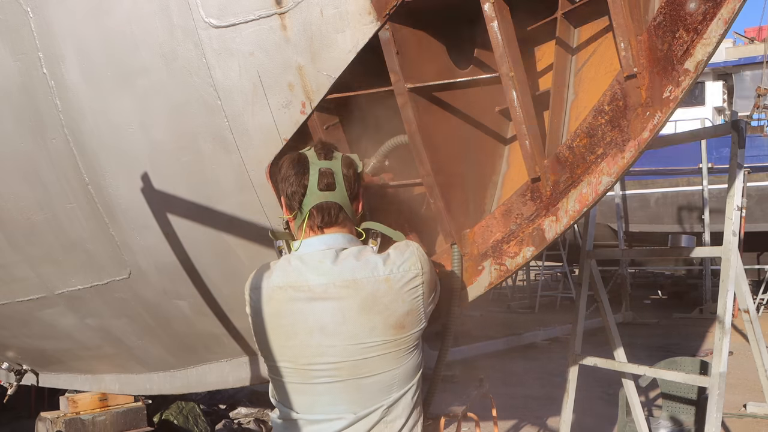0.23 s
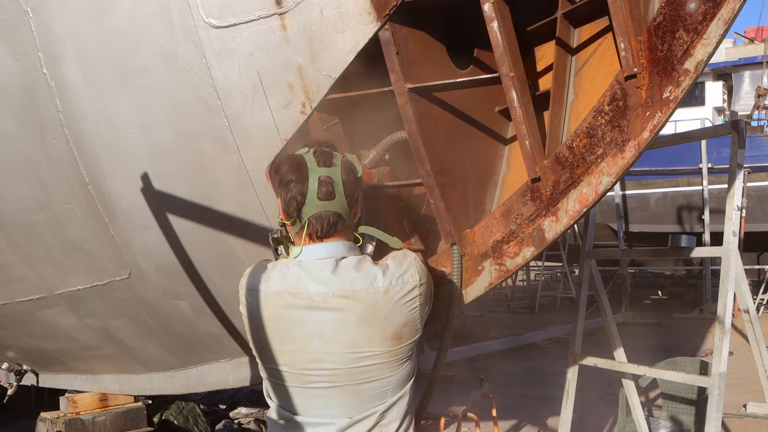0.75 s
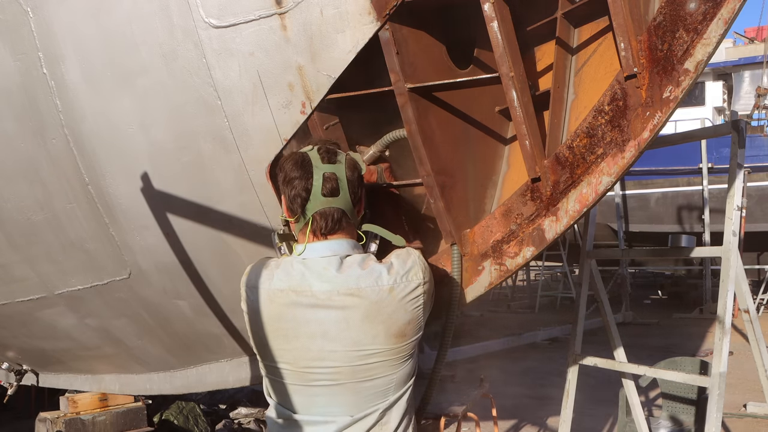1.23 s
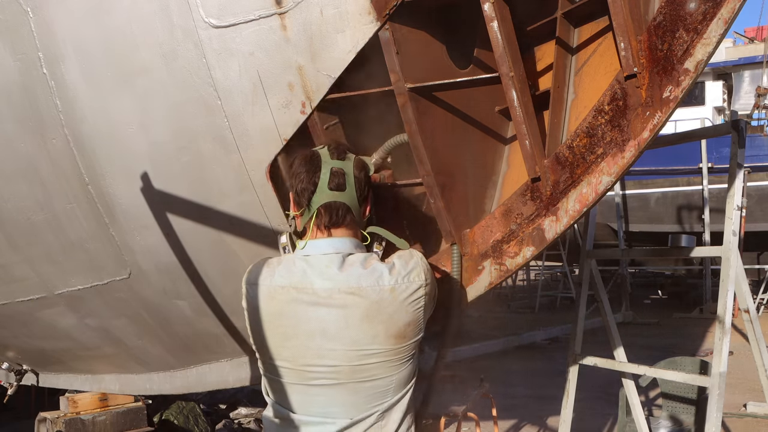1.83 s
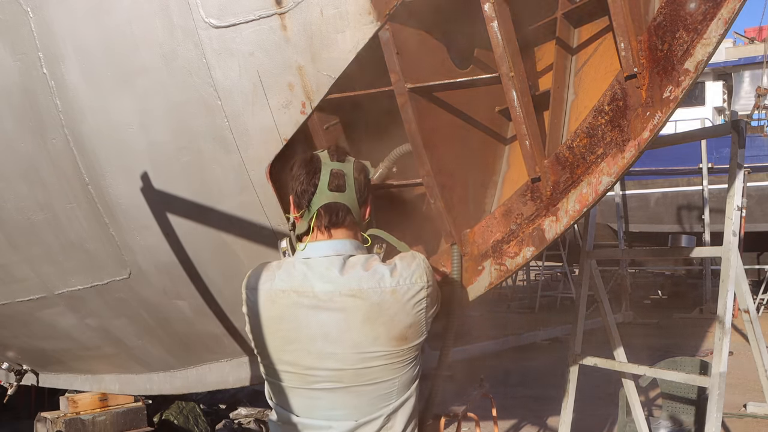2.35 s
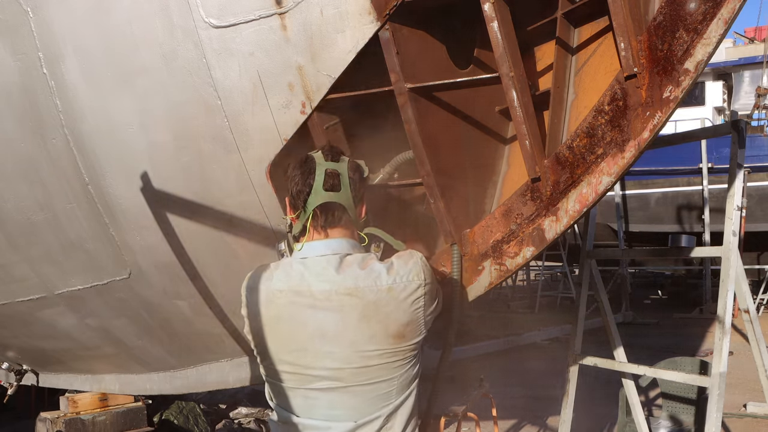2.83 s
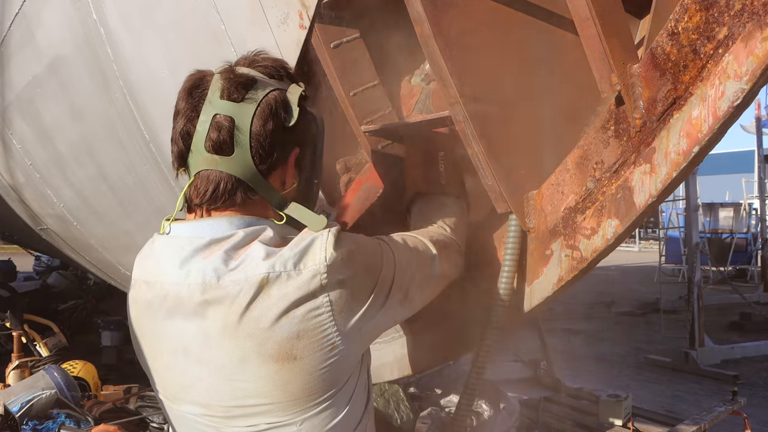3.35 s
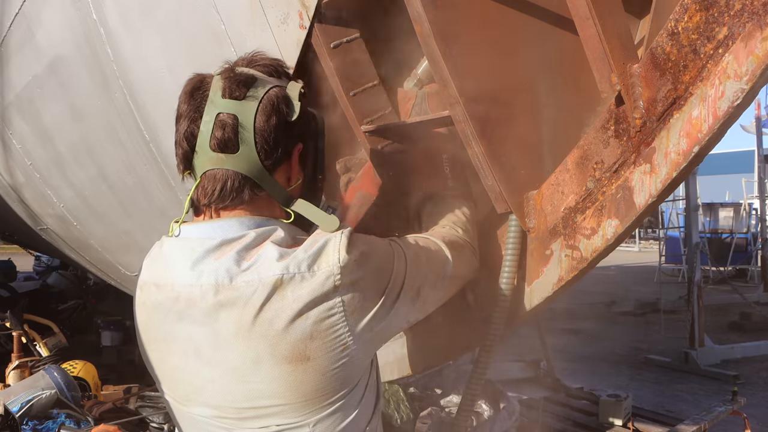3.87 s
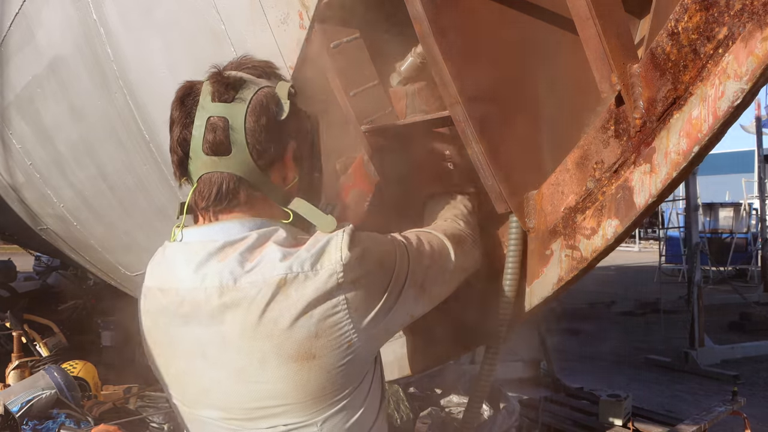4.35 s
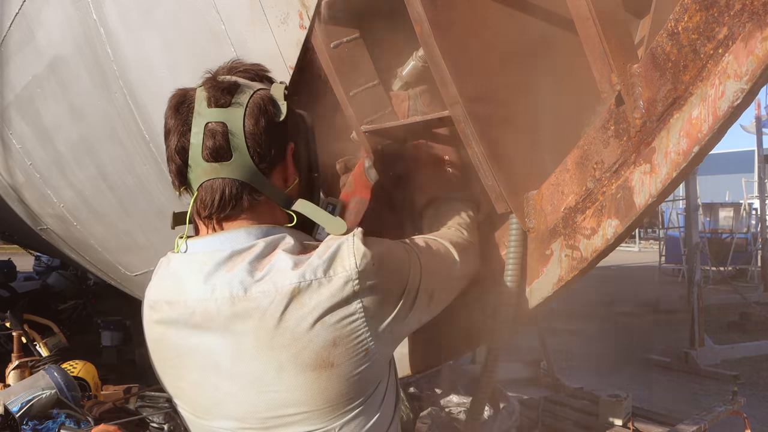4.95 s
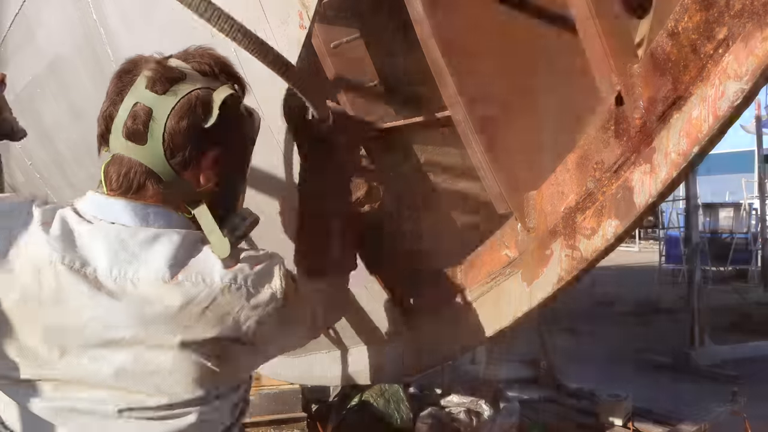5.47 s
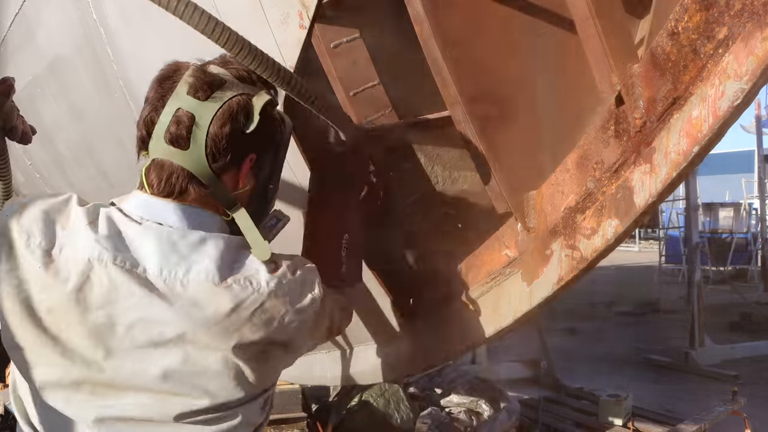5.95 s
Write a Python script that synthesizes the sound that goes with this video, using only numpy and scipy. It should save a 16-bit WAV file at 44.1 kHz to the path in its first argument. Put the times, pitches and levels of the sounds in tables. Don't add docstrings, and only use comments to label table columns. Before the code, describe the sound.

A continuous harsh sandblasting hiss scours steel plate, with a breathy roar from a hollow bay and faint wind bumps, brightening abruptly halfway through.

```python
import sys
import numpy as np
from scipy import signal
from scipy.fft import rfft, irfft, next_fast_len
from scipy.io import wavfile
from scipy.ndimage import uniform_filter1d, map_coordinates

SR = 44100
rng = np.random.default_rng(int(sys.argv[2]) if len(sys.argv) > 2 else 0)


def to_wav(sig):
    pcm = np.clip(np.atleast_2d(sig), -1, 1) * 32767
    pcm = np.round(pcm).astype(np.int16)
    wavfile.write(sys.argv[1], SR, pcm.T)


def invert_db(x):
    u = np.asarray(x, float) / 20
    return 10 ** u


N = 273661
EDGE = 1024


def unit(x):
    return x / np.sqrt(np.mean(x ** 2) + 1e-20)


def along(points, hz):
    f, v = np.transpose(points)
    return np.interp(np.log(hz + 1), np.log(f + 1), v, left=-120)


def wobble(rate):
    knots = rng.standard_normal(int(N * rate / SR) + 4)
    return unit(map_coordinates(knots, [np.arange(N) * rate / SR]))


def filtered(x, response):
    m = next_fast_len(len(x) + 8192)
    return irfft(rfft(x, m) * response(np.fft.rfftfreq(m, 1 / SR)), m)[:len(x)]


def lifted(modes, hz):
    return invert_db(sum(db * np.exp(-np.log(16) * ((hz - c) / w) ** 2) for c, w, db in modes))


def curves(rows):
    s, *cols = np.transpose(rows)
    return np.array([np.interp(np.arange(N) / SR, s, c) for c in cols])


def stepped(rows, moves):
    return np.transpose(rows)[:, np.searchsorted(moves[1:-1], np.arange(N) / SR)]


def bumps(rows):
    t = np.arange(0, N + 8, 8) / SR
    lift_db = sum(db * np.exp(-.5 * ((t - s) / life) ** 2) for s, life, db in rows)
    return np.interp(np.arange(N) / SR, t, lift_db)


def patchy(x, patch_db, size, bins, frames):
    z = signal.stft(x, nperseg=size)[2]
    field = uniform_filter1d(rng.standard_normal(z.shape), bins, 0)
    field = uniform_filter1d(field, frames, 1)
    return signal.istft(z * invert_db(patch_db * unit(field)), nperseg=size)[1][:N]


def in_hull(x, rust_db, modes_db):
    rusty = patchy(x, rust_db, size=512, bins=6, frames=12)
    return patchy(rusty, modes_db, size=2048, bins=2, frames=8)


def impacts(spread_db):
    return rng.standard_normal(N) * invert_db(spread_db * rng.standard_normal(N))


PLACE_TIMES = [0, 2.95, 5.468, 6.21]
STAGE_TIMES = [0, .55, 1.6, 2.95, 3.055, 4.76, 5.468, 5.575, 5.8, 6.035, 6.21]
PLACE_OF_STAGE = [0, 0, 0, 1, 1, 1, 2, 2, 2, 2]


def by_place(x, response, moves=PLACE_TIMES):
    ends = np.minimum(np.round(np.multiply(moves, SR)).astype(int), N)
    wide = np.pad(x, EDGE, mode="reflect")
    stretches = []
    for k, (a, b) in enumerate(zip(ends, ends[1:])):
        coloured = filtered(wide[a:b + 2 * EDGE], lambda hz: response(k, hz))
        stretches.append(unit(coloured[EDGE:-EDGE]))
    return np.concatenate(stretches)


# f/Hz, level/dB
WIND_COLOUR = [(10, -17), (50, -15), (100, -7), (150, -20), (200, -17), (370, -120)]
BREEZE_DB = [-71, -71.5, -74]
# t/s, f/Hz, length/s, level/dB
WIND_PUFFS = [(.004, 90, .006, -55), (.228, 70, .007, -56), (.258, 125, .013, -51), (.32, 70, .007, -57),
              (.35, 100, .012, -58), (.76, 60, .006, -57), (1.742, 95, .009, -52), (1.77, 80, .008, -54),
              (1.805, 190, .016, -46), (1.835, 35, .012, -60), (1.89, 80, .015, -60), (2.6, 70, .008, -59),
              (3.365, 90, .005, -56), (5.345, 80, .003, -57), (5.357, 280, .0009, -43),
              (5.47, 160, .003, -56)]


def wind():
    t = np.arange(N) / SR
    lumps = rng.standard_normal(N) * invert_db(4 * wobble(25))
    breeze = by_place(lumps, lambda k, hz: invert_db(along(WIND_COLOUR, hz)))
    out = breeze * invert_db(np.take(BREEZE_DB, np.searchsorted(PLACE_TIMES[1:3], t)))
    for s, hz, life, db in WIND_PUFFS:
        swell = invert_db(db) * np.exp(-.5 * ((t - s) / life) ** 2)
        out += swell * np.cos(2 * np.pi * hz * (t - s) + rng.uniform(0, 2 * np.pi))
    return out


# f/Hz, level/dB
ROAR_COLOURS = [
    [(88, -47), (150, -11.5), (456, -4), (731, -2), (837, 0), (2200, -0.5), (2860, -49), (4840, -120)],
    [(88, -42), (150, -16.5), (280, -12.5), (451, -13), (700, -4.5), (837, -6), (2200, -5.5), (2860, -32),
     (4840, -120)],
    [(88, -50), (150, -15.5), (451, -11.5), (632, -10), (837, -6.5), (2200, -7), (2860, -32), (4840, -120)],
    [(88, -67), (150, -25), (269, -13), (431, -19), (800, -7), (1500, -8), (2200, -3), (2860, -31),
     (4840, -120)],
    [(88, -52), (150, -15.5), (540, -7.5), (611, -2.5), (684, -3), (2200, -1), (2860, -32), (4840, -120)],
    [(88, -52), (150, -16), (400, -12), (611, -5), (945, -2.5), (2200, -3.5), (2860, -40), (4840, -120)],
    [(88, -64), (150, -25), (552, -20), (740, -18), (1020, -3.5), (2200, -8), (2860, -23), (4840, -120)],
    [(88, -69), (150, -22), (611, -11), (895, -5), (1060, -2.5), (2200, -7.5), (2860, -33), (4840, -120)],
    [(88, -69), (150, -17), (611, -14), (895, -5), (1060, -5), (2200, -5.5), (2860, -33), (4840, -120)],
    [(88, -40.5), (150, -18), (540, -20), (1000, -14), (1820, -8.5), (2200, -8), (2860, -33), (4840, -120)],
]
# f/Hz, width/Hz, level over the roar/dB
BAY_MODES = [
    [(215, 50, 4), (300, 60, 4), (460, 50, 6.5), (843, 55, 9.5), (930, 40, -2), (1005, 50, 4.5),
     (1160, 50, 4.5), (1420, 90, -3), (1510, 60, 3.5), (1610, 110, 3), (1800, 100, -4.5), (635, 120, -2)],
    [(240, 60, 3), (340, 55, 4.5), (410, 40, -2), (487, 50, 9), (612, 70, 7.5), (683, 30, -3),
     (742, 45, 6.5), (845, 40, 3), (945, 35, 6), (1070, 45, 2.5), (1135, 30, -2.5), (1190, 40, 1.5),
     (1370, 90, 2), (1660, 150, 2), (1470, 70, -3.5), (1810, 50, -3)],
    [(480, 55, 3), (610, 55, 3), (1050, 90, 3), (1250, 60, 4.5)],
]


def roar(feed):
    x = rng.standard_normal(N) * invert_db(0.29 * feed + 0.32 * wobble(7))
    x = in_hull(x, rust_db=.5, modes_db=1.15)
    return by_place(x, lambda k, hz: invert_db(along(ROAR_COLOURS[k], hz))
                    * lifted(BAY_MODES[PLACE_OF_STAGE[k]], hz), STAGE_TIMES)


# f/Hz, level/dB
PLATE_COLOURS = [
    [(1180, -36), (2000, -12), (2150, -12), (2340, -7.5), (2900, -2.5), (4500, -7), (5850, -41),
     (9900, -120)],
    [(1180, -32), (2000, -12), (2330, -10.5), (2710, -4.5), (3050, -1.5), (3500, -3.5), (4500, -8),
     (5850, -11), (9900, -120)],
    [(1180, -29), (2000, -15), (2330, -6), (2450, -8), (2710, -3.5), (3040, 0.5), (4500, -7.5), (5850, -13),
     (9900, -120)],
    [(1180, -41), (2050, -16), (2400, -1), (2900, -6), (3340, -3), (4500, -6), (5850, -12), (9900, -120)],
    [(1180, -27), (2000, -20), (2500, -9.5), (2980, -9.5), (3430, -6.5), (3860, -10.5), (4500, -11),
     (5850, -29), (9900, -120)],
    [(1180, -23), (2000, -24.5), (2250, -11.5), (2980, -12.5), (3200, -7), (3500, -8.5), (3860, -12.5),
     (4500, -13), (5850, -27), (9900, -120)],
    [(1180, -30), (2000, -8), (2300, -9.5), (3450, -2.5), (4500, -11), (5850, -38), (9900, -120)],
    [(1180, -23), (2000, -13.5), (3510, -6.5), (3900, -6), (4500, -16), (5850, -15), (9900, -120)],
    [(1180, -21), (2000, -14), (3400, -6), (3900, -5), (4300, -8), (5000, -10.5), (5850, -11), (9900, -120)],
    [(1180, -54), (2000, -19), (2900, -9), (3150, -6), (3570, -6), (4500, -8.5), (5850, -28.5),
     (9900, -120)],
]
# f/Hz, width/Hz, level/dB
STEEL_MODES = [
    [(2190, 60, -1.5), (2290, 90, 2), (2620, 70, 2), (2720, 120, -1), (2850, 100, 1.5), (2900, 50, -2),
     (3080, 110, 1.8), (3170, 50, -1.5), (3300, 90, 1.2), (3400, 70, 1), (3520, 90, 2), (3650, 60, -2),
     (3920, 70, 2), (4250, 70, 1.5), (4330, 90, -1), (4840, 140, 2), (5310, 90, 2.3), (5430, 110, -1),
     (5950, 150, 2), (6130, 120, -2), (6630, 150, -1.5), (6800, 150, 1.5)],
    [(2200, 110, 3), (2320, 120, -1.5), (2700, 80, 1.2), (3015, 90, -2.5), (3230, 100, 1), (3290, 40, -2.5),
     (3345, 50, 2.5), (3450, 110, 2), (3690, 80, 2), (3830, 70, -1), (3900, 70, 2.5), (3965, 60, -2),
     (4065, 100, 2.8), (4480, 140, 1.7), (5000, 200, -1.5), (6090, 180, -1.5), (6370, 110, 1.5),
     (6800, 150, 1.2), (6940, 100, -1.5), (7250, 250, 1.5), (7850, 100, -1.5), (5600, 300, 1),
     (9850, 300, 1.5), (10250, 300, -1), (12350, 400, -1), (12900, 550, 1.3), (14000, 500, -.8)],
    [(2010, 90, -3), (2200, 110, 3.5), (2350, 110, -3), (3100, 80, 2), (3550, 90, 1.5), (3640, 90, -2.5),
     (4050, 130, 3), (4240, 160, -2.8), (5620, 350, 2.5), (6800, 250, -1.5), (7170, 220, 3.5),
     (7550, 250, -1.5), (8800, 300, 1.2), (10700, 600, -.8), (12900, 700, 1.5), (14000, 500, -1)],
]


def plate(feed):
    x = impacts(spread_db=2.5) * invert_db(.5 * feed + 0.24 * wobble(15))
    x = in_hull(x, rust_db=.3, modes_db=1.9)
    return by_place(x, lambda k, hz: invert_db(along(PLATE_COLOURS[k], hz))
                    * lifted(STEEL_MODES[PLACE_OF_STAGE[k]], hz), STAGE_TIMES)


# f/Hz, level/dB
GRIT_COLOURS = [
    [(2530, -38), (4300, -13), (5860, -9), (6450, -10.5), (6990, -9.5), (10900, -14.5), (12900, -14.5),
     (15400, -18.5)],
    [(2530, -57), (4300, -18.5), (5020, -7), (6050, -5.5), (7330, -5.5), (9230, -8), (13100, -9.5),
     (15400, -13)],
    [(2530, -31), (4300, -11), (5590, -6), (6770, -4.5), (7260, -6.5), (10800, -8), (12900, -12),
     (15400, -11)],
]
RIB_DELAYS = [
    (.234, .31, .54, .69),
    (.243, .696, .932, 1.24),
    (.238, .699, .93, 1.258),
]
RIB_LEVELS = [
    (-25.5, -25, -41, -59),
    (-23, -37, -32, -22),
    (-18, -26, -30, -18),
]
LEAN_DELAYS = (.05, .008, .1, -.012)
RIB_SIDES = (1, -1, 1, -1)
# t/s, lean 0-1, facing the ribs/dB, turn to the left ribs/dB
NOZZLE_AIM = [(0, 0.04, -3, 10), (1.5, 0, -9, 3), (2.94, .1, 1, -4), (2.96, 0, -10, -2),
              (3.35, .95, -6, -1), (3.68, 1, 4, 8), (3.86, 0, 0, 2), (4.1, 0, -3, 0), (4.22, 0, 10, -2),
              (4.47, 0.1, 3, -15), (4.7, 0.4, 11, 5), (4.85, 0, -6, -1), (5.16, 0, -2, 5), (5.46, 0, 4, 1),
              (5.7, 0.1, 2, 0), (5.91, 0, 1, 4), (6.21, 0.5, -2, 1)]


def hiss(feed):
    x = impacts(spread_db=2.5) * invert_db(0.64 * feed + 0.27 * wobble(8.2))
    x = in_hull(x, rust_db=-0.14, modes_db=2.5)
    lean, facing_db, left_db = curves(NOZZLE_AIM)
    wander = np.array([wobble(5) for _ in range(8)])
    tremble_db, tremble_ms = 2 * wander[:4], .007 * wander[4:]
    echo_db = stepped(RIB_LEVELS, PLACE_TIMES) + facing_db + np.outer(RIB_SIDES, left_db) + tremble_db
    echo_db = np.minimum(echo_db, -13.5)
    delay_ms = stepped(RIB_DELAYS, PLACE_TIMES) + np.outer(LEAN_DELAYS, lean) + tremble_ms
    heard_from = np.arange(N) - delay_ms * SR / 1000
    echoes = sum(invert_db(db) * map_coordinates(x, [at], mode="mirror") for db, at in zip(echo_db, heard_from))
    return by_place(x + echoes, lambda k, hz: invert_db(along(GRIT_COLOURS[k], np.minimum(hz, 15400)))
                    * lifted(STEEL_MODES[k], hz))


# hiss level/dB, plate level/dB, roar level/dB
STAGE_LEVELS = [(-30, -32, -41.5), (-31, -31.5, -42), (-30.5, -31.5, -41.5), (-27.5, -28.5, -39.5),
                (-29, -32, -42), (-28.5, -32.5, -42.5), (-25.5, -32, -45), (-29, -33.5, -43.5),
                (-32, -34.5, -44.5), (-31.5, -38, -47)]
# t/s, grit feed level/dB, reach into the bay level/dB
JET_MOVES = [(0, 2.5, 2.5), (.3, 3, 1.3), (.8, 0.5, -0.2), (1.0, 2.3, -1.5), (1.25, 0.5, -1.4),
             (1.9, 0.5, 0), (2.55, -1, 1.5), (2.9, 0.4, 0.9), (3.45, -0.4, 1), (3.8, -1.1, 0.7),
             (3.95, -1.5, 0.4), (4.27, 1, 0.6), (4.5, -0.8, 0.5), (4.7, 0.5, -0.5), (4.9, 0, 0.5),
             (5.17, 1.5, -1.5), (5.68, -0.5, -0.5), (5.86, 6.5, 3.5)]
# t/s, length/s, level/dB
FEED_SURGES = [(.105, 0.037, 1), (.42, 0.045, -0.5), (.63, 0.036, 0), (.59, .006, 0), (.745, .006, 1.5),
               (.9, .006, -2), (1.57, 0.027, 0), (2.42, .012, -2), (2.52, 0.063, 1.5), (3.18, 0.035, -0.8),
               (3.44, .025, 0.5), (3.5, 0.018, -1.5), (3.59, .025, 0.5), (3.66, .06, 0.4),
               (3.76, 0.027, 2.5), (4.3, 0.064, 0), (4.7, 0.039, 1.5), (4.9, .09, -0.5), (5.02, .015, -1.5),
               (5.08, .03, 1.7), (5.56, .015, 0), (5.595, .015, 1), (5.79, .01, 0.5), (5.627, .002, 3),
               (5.905, .002, 0), (5.97, .04, -1), (6.17, .03, -1), (5.44, .02, 0.5), (5.66, .02, -1.5),
               (5.72, .015, -1), (5.77, 0.014, -5), (6.12, 0.031, 0.7)]
# t/s, length/s, level/dB
FREE_PANELS = [(.21, 0.055, 1), (.94, .05, 1), (1.99, .05, 1), (2.72, 0.028, 3), (2.81, 0.018, 0),
               (3.69, .06, 0.8), (4.11, 0.076, 0.8), (4.74, 0.031, 1.5), (4.86, 0.099, -2),
               (5.15, 0.042, 0), (5.77, 0.034, 1), (1.46, .1, -0.2), (3.41, .1, 0), (5.63, 0.028, 0.5),
               (2.25, 0.093, -.5)]
# t/s, length/s, level/dB
BAY_CORNERS = [(.21, 0.057, 1.5), (1.32, 0.054, 1.5), (1.6, 0.1, 1), (1.95, 0.13, 0.5), (2.58, 0.054, 1),
               (3.48, 0.036, -1.5), (4.0, 0.081, 2), (5.9, 0.088, -6), (6.12, 0.053, -6.5), (5.75, .02, -1),
               (0.47, .15, -0.9), (2.32, .12, -0.5), (7.5, .03, 1), (4.5, .1, -.5)]


def levels():
    feed_db, reach_db = curves(JET_MOVES)
    since = np.arange(N) / SR - PLACE_TIMES[2]
    swing_db = 10.5 * np.exp(-abs(since) / 0.04) * (since > 0)
    hiss_db = feed_db + bumps(FEED_SURGES) + 0.13 * swing_db
    plate_db = 0.26 * feed_db + 0.41 * reach_db + bumps(FREE_PANELS)
    roar_db = 0.11 * feed_db + reach_db + bumps(BAY_CORNERS) + swing_db
    return stepped(STAGE_LEVELS, STAGE_TIMES) + [hiss_db, plate_db, roar_db]


# t/s, length/s, level/dB
GRIT_CLOTS = [(1.057, .004, 2), (1.339, 0.0018, 1), (1.958, .005, 1), (2.887, .003, 1), (2.997, .003, 0),
              (3.032, 0.001, 2), (3.043, 0.0024, 5.5), (3.197, 0.0037, 2), (3.348, .004, 4.5),
              (3.648, 0.0042, 2.5), (4.27, .006, 3), (4.418, .002, 1), (4.675, .006, 2), (4.995, .004, 2),
              (5.18, .003, 3), (5.49, .003, 2), (5.627, .002, 2), (5.714, .003, 4), (5.87, .002, 2)]


def scene():
    feed = 0.17 * wobble(13) + .5 * wobble(30) + 0.22 * wobble(90)
    clots_db = bumps(GRIT_CLOTS)
    breeze = wind()
    bay = roar(feed)
    steel = plate(feed) * invert_db(clots_db)
    grit = hiss(feed) * invert_db(0.29 * clots_db)
    mono = np.sum(invert_db(levels()) * np.array([grit, steel, bay]), axis=0) + breeze
    return np.array([mono, mono])


def top_cut(x):
    return signal.sosfilt(signal.butter(12, 17040, fs=SR, output="sos"), x)


# t/s, number of bands
SPREADS = [(.056, 2), (.241, 1), (.497, 1), (.822, 1), (.984, 2), (1.147, 1), (1.309, 1), (1.402, 1),
           (1.472, 1), (1.681, 2), (1.983, 3), (2.494, 1), (2.772, 2), (2.865, 1), (2.981, 3), (3.399, 4),
           (3.562, 2), (3.724, 3), (3.794, 1), (3.864, 1), (4.096, 2), (4.978, 3), (5.373, 1), (5.396, 2),
           (5.419, 1), (5.768, 3), (5.837, 1), (5.93, 2), (6.046, 1)]


def record(dry):
    top_hz, low_edge_hz, width_hz = 15730, 4200, 1450
    hop, offset = 1024, 403
    mid, side = filtered(dry[0], lambda f: f < top_hz), np.zeros(N)
    n = np.arange(2 * hop) + .5
    window = np.sin(np.pi * n / (2 * hop))
    line = np.arange(hop) + .5
    basis = window * np.cos(np.pi / hop * np.outer(line, n + hop / 2)) * np.sqrt(2 / hop)
    lows = np.arange(low_edge_hz, top_hz - 1, width_hz)
    for s, count in SPREADS:
        start = offset + hop * (round((s * SR - offset) / hop) - 1)
        frame = slice(start, start + 2 * hop)
        for low_hz in rng.permutation(lows)[:count]:
            high_hz = min(low_hz + width_hz, top_hz)
            band = basis[round(low_hz * 2 * hop / SR):round(high_hz * 2 * hop / SR)]
            lines = band @ mid[frame]
            mid[frame] -= (1 - np.sqrt(.5)) * lines @ band
            side[frame] += invert_db(-2.8) * rng.permutation(lines) @ band
    return top_cut(np.array([mid + side, mid - side]))


dry = scene()
out = record(dry)
to_wav(out)
```